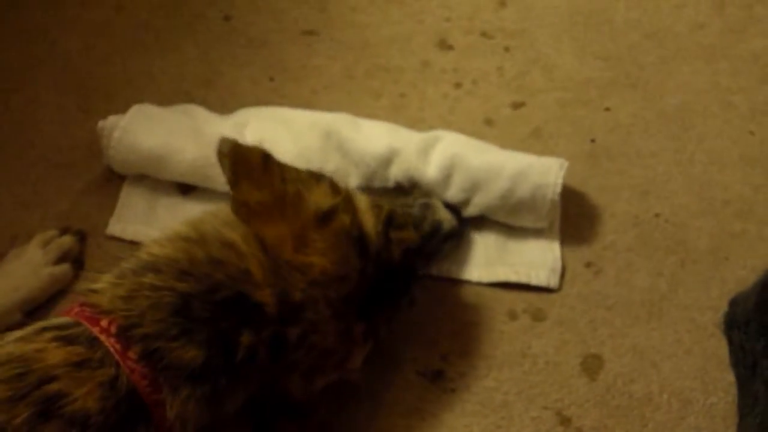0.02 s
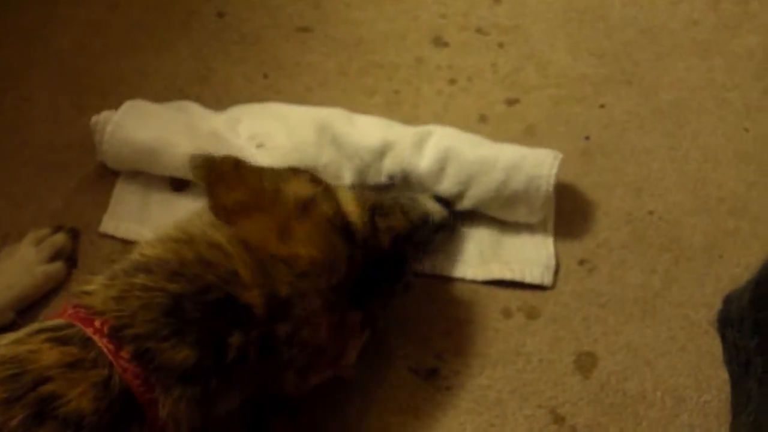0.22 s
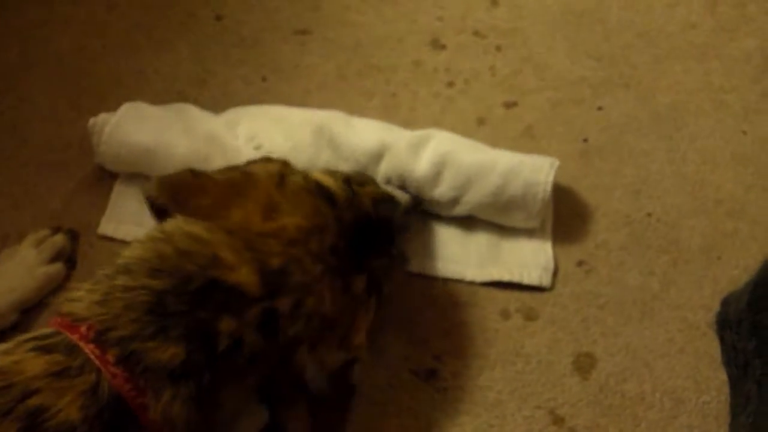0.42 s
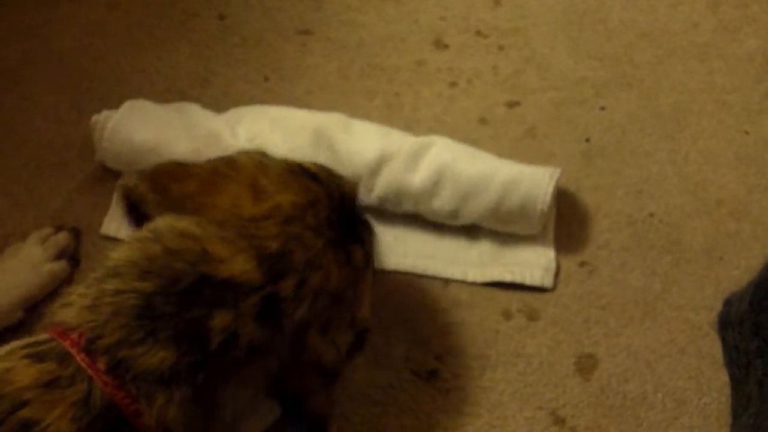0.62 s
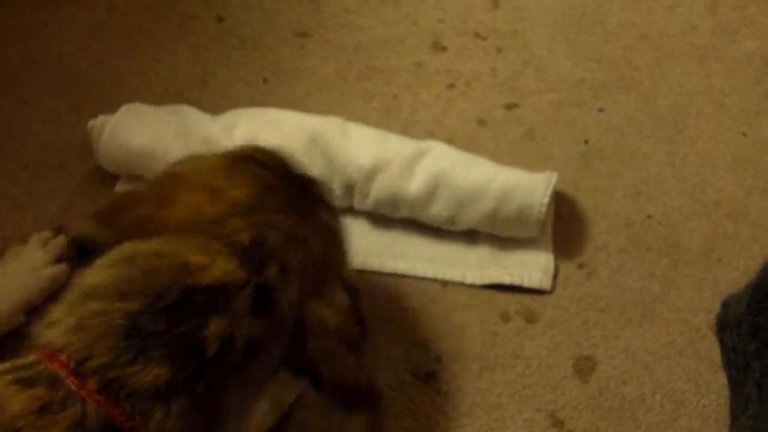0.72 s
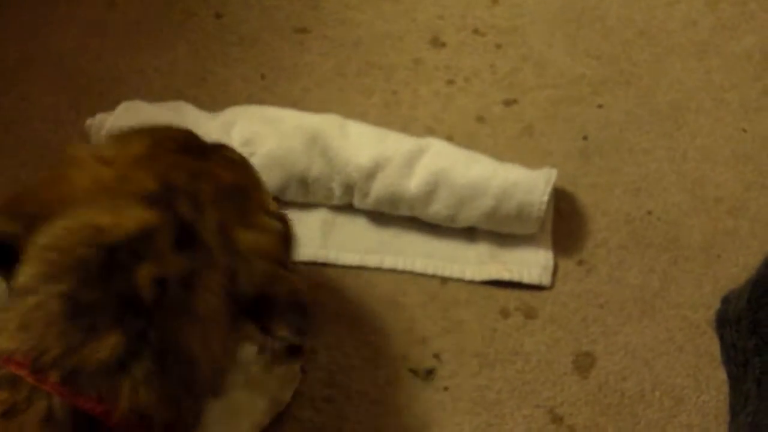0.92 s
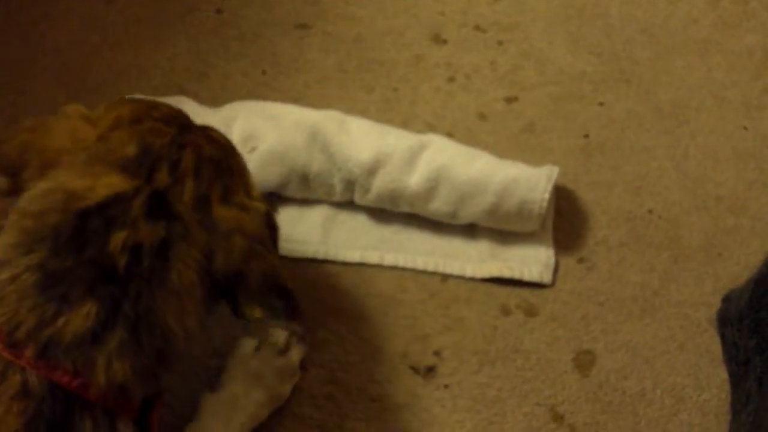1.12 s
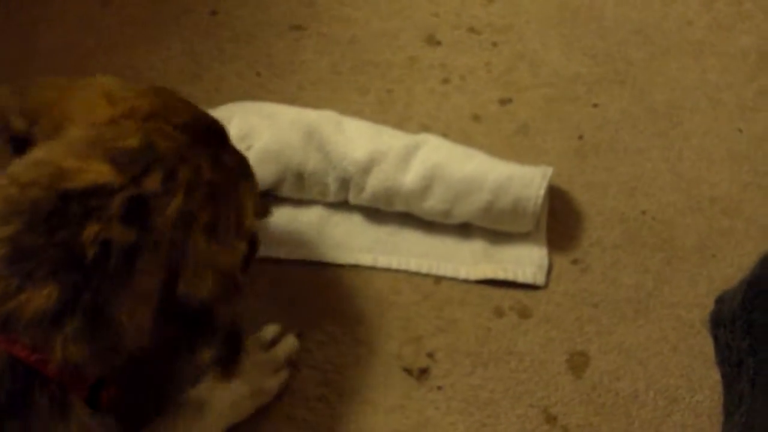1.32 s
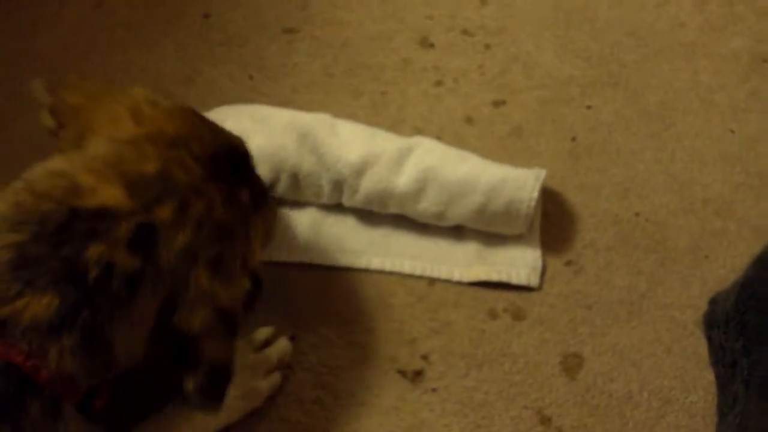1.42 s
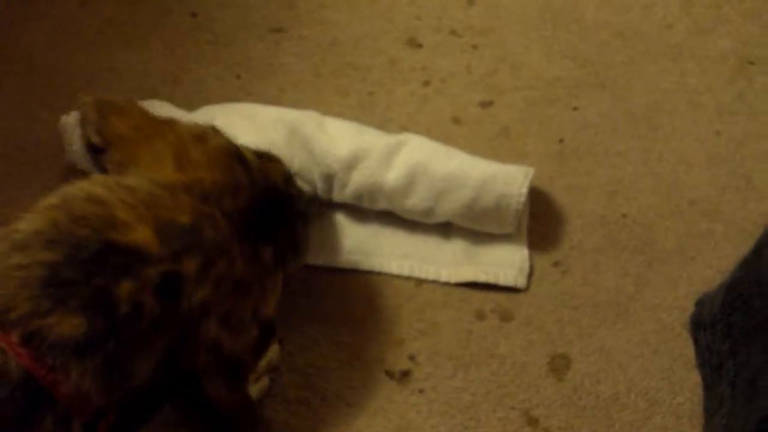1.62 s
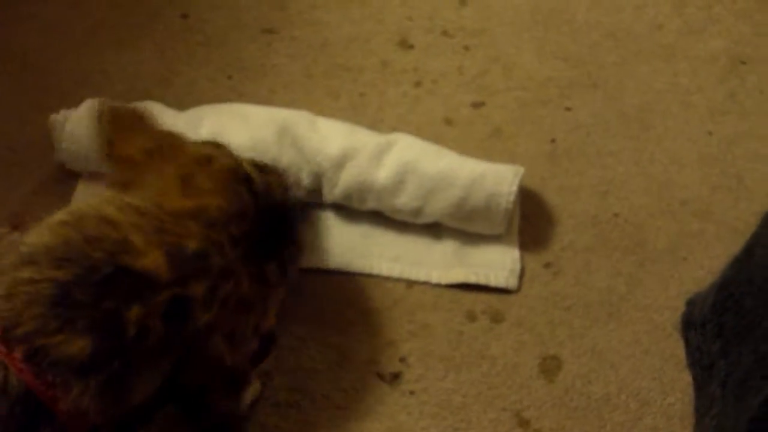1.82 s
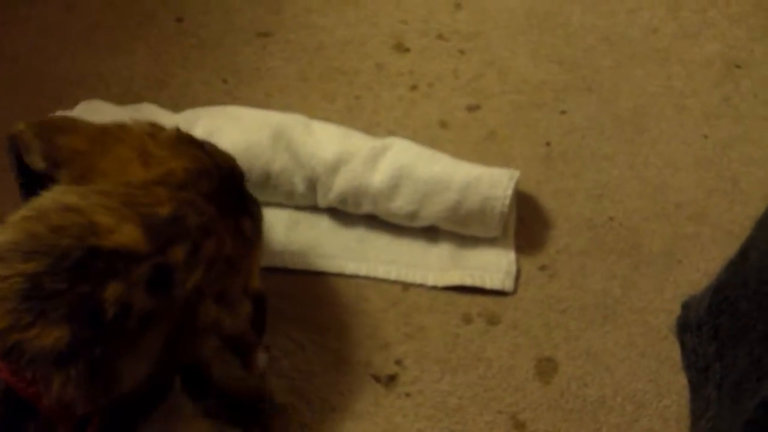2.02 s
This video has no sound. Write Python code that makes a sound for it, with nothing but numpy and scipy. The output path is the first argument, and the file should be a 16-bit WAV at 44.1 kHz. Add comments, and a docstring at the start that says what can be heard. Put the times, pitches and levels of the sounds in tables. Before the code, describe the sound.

A steel training clicker snaps twice, very close to the microphone, just after light collar tag ticks. Then a dog shuffles on carpet with cloth rustles, hollow dull knocks and faint tinkles in a small furnished room.

```python
"""Dog and clicker on a carpet

A dog noses about a rolled towel: its collar tags tick, and a steel spring, probably a training clicker,
snaps down and up close to the microphone. Then the dog shuffles, with rustles, dull knocks and faint tinkles.
Struck things are sets of ringing tones; cloth, paws, hiss and rumble are shaped noise. A small furnished
room answers, and the microphone's gain control turns loud peaks down and then recovers.
"""
import sys
import numpy as np
from scipy import signal
from scipy.fft import rfft, irfft, next_fast_len
from scipy.io import wavfile
from scipy.ndimage import minimum_filter1d, map_coordinates

SR = 44100
rng = np.random.default_rng(int(sys.argv[2]) if len(sys.argv) > 2 else 0)


def unload_wav(signal):
    """Save mono or channel-first audio to the path in sys.argv[1] as 16-bit WAV at rate SR, clipped to [-1, 1]."""
    wavfile.write(
        sys.argv[1],
        SR,
        np.round(np.clip(np.atleast_2d(signal).T, -1, 1) * 32767).astype(np.int16),
    )


N = 92610  # samples, 2.1 s


def amp(db):
    """Turn decibels into a gain."""
    return 10 ** (np.asarray(db) / 20)


def unit(x):
    """Scale a sound to an rms of 1."""
    return x / np.sqrt(np.mean(x ** 2) + 1e-20)


def along(points, hz):
    """Read a curve of (f/Hz, value) points, joined up on a log frequency axis."""
    f, value = np.transpose(points)
    return np.interp(np.log(hz + 1), np.log(f + 1), value)


def since(s):
    """Seconds passed since time s, and zero before it."""
    return np.maximum(np.arange(N) / SR - s, 0)


def wobble(rate):
    """A smooth random curve through `rate` random points a second."""
    points = rng.standard_normal(N // 8)
    return map_coordinates(points, [np.arange(N) * rate / SR], mode="wrap")


def filtered(x, response):
    """Change each frequency of x by the gain response(hz)."""
    size = next_fast_len(N + SR // 2)
    hz = np.fft.rfftfreq(size, 1 / SR)
    return irfft(rfft(x, size) * response(hz), size)[:N]


def noise(colour, tilt_db=0):
    """Noise of rms 1 with a given colour, tilted by tilt_db per octave above 700 Hz."""
    def response(hz):
        octaves = np.log2(np.maximum(hz, 700) / 700)
        return amp(along(colour, hz) + tilt_db * octaves)
    return unit(filtered(rng.standard_normal(N), response))


def swell(s, spread):
    """A bell-shaped rise and fall around time s; spread is its standard deviation in seconds."""
    return np.exp(-.5 * ((since(0) - s) / spread) ** 2)


def struck(s, modes, damp_s=1):
    """A blow at time s sets tones ringing: wider ones die faster, and all are choked over damp_s."""
    t = np.arange(SR // 5) / SR
    ring = np.zeros(len(t))
    for k, (hz, width, db) in enumerate(modes):
        sign = (-1) ** k
        strength = amp(db) * 2 * np.pi * width / SR
        ring += sign * strength * np.exp(-np.pi * width * t) * np.sin(2 * np.pi * hz * t)
    out = np.zeros(N + SR)
    out[round(s * SR):][:len(t)] = ring * np.exp(-(t / damp_s) ** 2)
    return out[:N]


# how long the room rings on at each pitch: f/Hz, time to fall by 60 dB/s
ROOM_DECAY = [(100, 0.11), (1000, 0.2), (4000, 0.15), (8000, 0.19), (16000, 0.45)]
# colour of the room's tail: f/Hz, relative level/dB
ROOM_COLOUR = [(100, 9), (1200, -1.5), (3000, -1), (8500, 3.5), (12000, -3.5), (16000, 0.5)]
# early echoes off the walls: delay t/s, gain (plain ratio)
WALL_ECHOES = [(.0055, .15), (0.0101, 0.082), (0.0145, 0.16)]


def room(x):
    """The room answers with a few early echoes and a short tail that fades at its own pace at each pitch."""
    hz, t, grains = signal.stft(rng.standard_normal(SR // 2), SR, nperseg=256)
    fade_db = -60 * t / along(ROOM_DECAY, hz)[:, None]
    colour_db = along(ROOM_COLOUR, hz)[:, None]
    answer = signal.istft(grains * amp(colour_db + fade_db), SR, nperseg=256)[1]
    answer = answer / np.linalg.norm(answer)
    for delay, gain in WALL_ECHOES:
        answer[round(delay * SR)] += gain
    return signal.fftconvolve(x, answer)[:N]


# colour of the steady hiss: f/Hz, relative level/dB
HISS_COLOUR = [(20, -10.5), (100, -5.5), (300, -10), (650, -11), (1300, -13.5), (2400, -15.5), (4500, -17),
               (6600, -18.5), (7600, -17.5), (8400, -18), (9100, -19), (10000, -19.5), (16000, -23)]
# colour of the rumble: f/Hz, relative level/dB
RUMBLE_COLOUR = [(8, -4), (15, 15), (40, 3.5), (60, 1), (87, -10), (130, -2), (170, -14), (280, -12),
                 (420, -21.5), (900, -29.5), (3000, -76)]
# how the movement rumble rises and falls, before its random swing: t/s, level/dB
RUMBLE_LEVEL = [(0, -46), (.22, -49), (0.301, -48), (.47, -46.5), (.56, -57.5), (0.671, -55.5), (.8, -45.5),
                (1.001, -51.5), (1.298, -48), (1.42, -50), (1.62, -48), (1.8, -50), (2.1, -47)]
# low hum: f/Hz, level/dB when the rumble is at its median level
HUM = [(55.6, -57.5), (119.5, -64), (219, -70.5), (302, -71.5)]
# thin high whine: f/Hz, level/dB
WHINE = [(8538, -74), (8607, -82.5), (9356, -84)]
HISS_DB, RUMBLE_SWING_DB = -57.5, 2
HUM_FOLLOWS = 1.1  # dB of hum per dB of rumble
TONE_DRIFT = 0.21  # how far the hum and whine wander in phase, radians


def steady_tones(table):
    """Sum steady tones whose phase wanders a little."""
    out = np.zeros(N)
    for hz, db in table:
        phase = 2 * np.pi * hz * since(0) + TONE_DRIFT * wobble(14)
        out += amp(db) * np.sqrt(2) * np.sin(phase)
    return out


def background():
    """Steady hiss and a thin whine; an uneven rumble, and a low hum that sinks and rises with it."""
    hiss = amp(HISS_DB) * noise(HISS_COLOUR)
    level_db = np.interp(since(0), *np.transpose(RUMBLE_LEVEL))
    rumble = amp(level_db + RUMBLE_SWING_DB * wobble(2.3)) * noise(RUMBLE_COLOUR)
    hum_gain = amp(HUM_FOLLOWS * (level_db - np.median(level_db)))
    return hiss + steady_tones(WHINE) + rumble + hum_gain * steady_tones(HUM)


# soft footfalls on the carpet: t/s, level/dB before fading
STEPS = [(0.686, -34.5), (0.793, -39), (.822, -39), (1.96, -44)]
# colour of a footfall: f/Hz, relative level/dB
STEP_COLOUR = [(20, 15.5), (60, -5.5), (130, -14), (250, -13.5), (500, -21), (1500, -23), (5000, -66)]
STEP_S = 0.016  # fading time, seconds


def steps():
    """Paws land as soft, low puffs: noise that swells quickly and fades."""
    out = np.zeros(N)
    for s, db in STEPS:
        u = since(s) / STEP_S
        out += amp(db) * noise(STEP_COLOUR) * np.exp(-u) * (1 - np.exp(-10 * u))
    return out


# scrapes: middle t/s, spread/s, f/Hz, level/dB at the middle
SCRAPES = [(0.215, 0.0086, 834, -55.5), (0.762, 0.013, 1560, -54.5), (0.784, 0.015, 670, -54),
           (0.934, 0.021, 1450, -61.5), (1.008, 0.013, 1240, -53), (1.015, 0.0029, 4560, -42.5),
           (1.061, 0.014, 1060, -58), (1.069, 0.018, 780, -52), (1.114, 0.0021, 7970, -36),
           (1.144, 0.01, 1060, -46), (1.311, 0.021, 1080, -51), (1.321, 0.0066, 5500, -50),
           (1.328, 0.0022, 4300, -43.5), (1.327, 0.005, 930, -42), (1.357, 0.01, 1060, -48)]
SCRAPE_Q = 8.3  # sharpness of the resonance


def scrapes():
    """Each short scrape is noise that excites one resonance."""
    out = np.zeros(N)
    for s, spread, hz, db in SCRAPES:
        width = hz / SCRAPE_Q
        tone = filtered(rng.standard_normal(N), lambda f: 1j * f * width / (hz ** 2 - f ** 2 + 1j * f * width))
        out += amp(db) * unit(tone) * swell(s, spread)
    return out


# scuffs of paws and fur: middle t/s, spread/s, level/dB at the middle, treble tilt/dB per octave
SCUFFS = [(0.21, 0.0084, -57, -1), (.775, 0.016, -54.5, -8), (0.949, 0.024, -57, -2.5),
          (1.012, 0.0066, -47.5, 0.5), (1.028, .005, -42, -2.5), (1.074, 0.071, -53, -3.5),
          (1.109, 0.0026, -38.5, -0.5), (1.173, 0.0054, -50, -8), (1.183, 0.026, -44.5, -5),
          (1.291, 0.0023, -49, -1), (1.3262, 0.0056, -40.5, 6.5), (1.337, 0.016, -44.5, -2),
          (1.381, 0.0037, -41, -3.5), (1.392, 0.0021, -40.5, 9), (1.399, 0.039, -47.5, -5.5),
          (1.455, .003, -63, 3), (1.52, 0.01, -58, -1), (2.004, 0.045, -54, -1.5), (2.095, 0.019, -59, -1)]
# colour of rubbed cloth before the tilt: f/Hz, relative level/dB
CLOTH_COLOUR = [(100, 1.5), (280, 5), (620, -6.5), (1050, 1.5), (1600, -0.5), (2600, -2), (3600, -3.5),
                (4700, -2), (6300, -9), (8200, 2), (10500, -19.5), (16000, -30.5)]
FIBRE_DB, FIBRES_PER_S = 2.5, 700  # depth and rate of the grain


def rustle():
    """Short strokes over cloth and carpet: noise, grainy as the fibres catch."""
    out = np.zeros(N)
    for s, spread, db, tilt in SCUFFS:
        grainy = unit(noise(CLOTH_COLOUR, tilt) * amp(FIBRE_DB * wobble(FIBRES_PER_S)))
        out += amp(db) * grainy * swell(s, spread)
    return out


# dull knocks: t/s, thud level/dB, knock f/Hz, knock level/dB, crack level/dB before its fade
KNOCKS = [(.1930, -20.5, 1272, -10, -41), (1.0090, -2.5, 1210, 1, -43.5), (1.03, -14, 1150, -1, -73),
          (1.0544, 6, 960, 0.5, -39), (1.083, 10.5, 980, 0, -44), (1.1319, 20, 1049, 16, -28),
          (1.1713, 3, 1210, 20, -30), (1.1819, -4, 1204, 11.5, -57), (1.3694, 9.5, 1050, -5, -37.5),
          (1.3861, 20, 1007, 10.5, -36.5), (1.3897, 19.5, 1188, 6, -31.5), (2.0542, -18, 1435, -7, -41.5),
          (2.0965, -25, 1930, -8, -67)]
# ringing of the floor: f/Hz, width/Hz, relative level/dB
THUD_MODES = [(268.5, 27, 0.5), (303, 40, -1), (449, 46, -10.5)]
# hollow ring: ratio to the knock's f, width/Hz, relative level/dB
KNOCK_MODES = [(0.841, 150, -8.5), (1, 90.8, 6), (1.139, 183, -4), (2.55, 350, -14.5)]
# colour of the crack: f/Hz, relative level/dB
CRACK_COLOUR = [(200, 6.5), (900, -6), (1700, 0.5), (2700, 0), (3700, -13), (4600, -7.5), (6300, -21),
                (8200, -8.5), (11000, -27.5), (16000, -26)]
CRACK_S = .003  # fading time, seconds
CONTACT_HZ = 2200  # a soft contact rounds off the treble of thud and ring


def knocks():
    """Each knock has a thud in the floor, a hollow ring and a brief crack of noise."""
    body, cracks = np.zeros(N), np.zeros(N)
    for s, thud_db, knock_hz, knock_db, crack_db in KNOCKS:
        body += amp(thud_db) * struck(s, THUD_MODES)
        ring_modes = [(knock_hz * ratio, width, db) for ratio, width, db in KNOCK_MODES]
        body += amp(knock_db) * struck(s, ring_modes)
        u = since(s) / CRACK_S
        cracks += amp(crack_db) * noise(CRACK_COLOUR) * 2 * np.exp(-u) * (1 - np.exp(-4 * u))
    softened = filtered(body, lambda hz: 1 / (1 + (hz / CONTACT_HZ) ** 2))
    return softened + cracks


# ringing of the collar tags, before pitch and tilt: f/Hz, width/Hz, relative level/dB
TAG_MODES = [(2450, 350, -18.5), (3500, 360, -14), (4550, 130, 0), (6350, 500, -16), (7200, 200, -5),
             (8200, 300, 0), (8500, 130, 1), (9300, 210, -6.5), (10900, 600, -12.5), (11700, 400, -16),
             (14600, 900, -16.5)]
# tag ticks: t/s, level/dB added to the modes, tilt/dB per octave, pitch ratio
TICKS = [(.0878, 2, -0.5, 1), (.0943, -11.5, -7, 1.2), (.1030, -35, -7, 0.96), (.1140, -40.5, -1, 1.15),
         (.1459, 8, 3.5, 0.97), (.2223, 3.5, -6, 1.02), (.2395, -8, -8.5, 0.76), (1.0100, -12, -7, 0.98),
         (1.1078, -15, -2, 1.3), (1.11, -13, -2, 1.06), (1.3095, -14.5, 8.5, 1.2), (1.3263, -8, -3.5, 1.04),
         (1.3570, -14, -2, 1.1)]
# faint tinkles of a tag's rim: t/s, starting level/dB
TINKLES = [(.966, -50), (.983, -56), (1.277, -49), (1.668, -55), (1.752, -48), (2.032, -52)]
FUR_DAMP_S = .0028  # the fur chokes a tick over this time
RIM_HZ, RIM_T60_S = 9280, .04  # rim pitch, and seconds to fall by 60 dB


def tags():
    """The tags touch in short ticks choked by fur; now and then a rim rings faintly as one fading tone."""
    out = np.zeros(N)
    pivot_hz = TAG_MODES[5][0]  # the tilt turns about this mode
    for s, db, tilt, pitch in TICKS:
        modes = [(hz * pitch, width, level + tilt * np.log2(hz / pivot_hz)) for hz, width, level in TAG_MODES]
        out += amp(db) * struck(s, modes, FUR_DAMP_S)
    for s, db in TINKLES:
        t = since(s)
        out += amp(db - 60 * t / RIM_T60_S) * np.sin(2 * np.pi * RIM_HZ * t)
    return out


# the spring going down: f/Hz, width/Hz, relative level/dB
PRESS_MODES = [(3660, 600, -6), (4174, 220, -13.5), (4646, 140, -25), (6000, 660, -6.5), (7320, 255, 2),
               (8140, 420, -3), (9150, 500, -0.5), (9670, 320, 2.5), (10400, 250, -5), (11850, 420, -21.5),
               (12360, 284, -5), (14680, 900, -10), (15550, 120, -12.5)]
# the spring coming back: f/Hz, width/Hz, relative level/dB
RELEASE_MODES = [(996, 680, -13), (2025, 920, -11.5), (3290, 284, -1.5), (4210, 195, -4), (4730, 280, -5),
                 (5910, 240, -2), (6770, 160, -1.5), (7520, 214, 3), (8030, 450, -1), (9180, 260, 3),
                 (10200, 120, -17), (12100, 160, -26), (13600, 1300, -16), (15200, 230, -22)]
# snaps: t/s, level/dB added to the modes, low push level/dB, room level/dB, room tilt/dB per octave,
# wall echo level/dB relative to the snap
SNAPS = [(0.2417, 26, 21.5, -23, 1.5, -13.5), (0.4501, 25.5, 3, -32, -5, -28.5)]
# colour of the room's hiss after a snap, before the tilt: f/Hz, relative level/dB
SNAP_TAIL_COLOUR = [(200, -37.5), (900, -21), (2200, -11), (4300, -3.5), (6300, -4), (8400, 2.5),
                    (10000, 0), (11500, -11.5), (14000, -5.5), (16000, -14.5)]
# colour of the wall's echo: f/Hz, level/dB added to the echo
ECHO_COLOUR = [(1000, -11.5), (3000, -7), (6500, -12), (8600, 4.5), (10500, -16.5), (16000, -13)]
PUSH_S, THUMB_DAMP_S, ECHO_S = .00011, 0.01, .0151  # push time, choking time, echo delay, seconds
TAIL_EARLY_T60_S, TAIL_LATE_T60_S, TAIL_LATE_DB = .13, 0.2, -10  # a fast fade and a weaker, slower one


def clicker():
    """Each snap is a push of air and a burst of choked tones; a wall echoes it and the room hisses briefly."""
    out = np.zeros(N)
    for snap_row, modes in zip(SNAPS, (PRESS_MODES, RELEASE_MODES)):
        s, db, push_db, room_db, tilt, echo_db = snap_row
        t = since(s)
        snap = amp(db) * struck(s, modes, THUMB_DAMP_S)
        push = -amp(push_db) * t / PUSH_S * np.exp(-t / PUSH_S) / (PUSH_S * SR)
        late_snap = struck(s + ECHO_S, modes, THUMB_DAMP_S)
        echo = amp(db + echo_db) * filtered(late_snap, lambda hz: amp(along(ECHO_COLOUR, hz)))
        fade = amp(-60 * t / TAIL_EARLY_T60_S) + amp(TAIL_LATE_DB - 60 * t / TAIL_LATE_T60_S)
        tail = amp(room_db) * (t > 0) * fade * noise(SNAP_TAIL_COLOUR, tilt)
        out += snap + push + echo + tail
    return out


TAG_ROOM_DB, DOG_ROOM_DB = -15.5, -11  # how much tags and paws feed the room


def scene():
    """The clicker is near; the dog is farther off, with more of the room."""
    behind = background() + steps()
    paws = scrapes() + rustle() + knocks()
    collar = tags()
    answer = room(amp(TAG_ROOM_DB) * collar + amp(DOG_ROOM_DB) * paws)
    return (behind + paws + collar + answer + clicker())[None]


DUCK_FROM_DB, DUCK_MAX_DB = -13.5, 8.5  # peaks above the first are turned down, by at most the second
DUCK_ATTACK_S, DUCK_HOLD_S, RECOVER_DB_PER_S = .006, 0.17, 27
CLIP_AT, TOP_HZ = .9, 16200  # level where loud peaks are clipped, before the top is cut; top of the band


def record(dry):
    """Gain control ducks after loud peaks, holds and recovers; what is still too loud clips; the top is cut."""
    x = dry[0]
    over_db = np.clip(20 * np.log10(np.abs(x) + 1e-9) - DUCK_FROM_DB, 0, DUCK_MAX_DB)
    half = int(DUCK_HOLD_S * SR / 2)
    # the largest excess over the past hold time
    held_db = -minimum_filter1d(-over_db, 2 * half + 1, origin=half, mode="constant")
    # let it fall no faster than the recovery rate
    ramp = RECOVER_DB_PER_S * since(0)
    target_db = np.maximum.accumulate(held_db + ramp) - ramp
    # smooth it, so that the ducking sets in gradually
    pole = np.exp(-1 / (DUCK_ATTACK_S * SR))
    duck_db = signal.lfilter([1 - pole], [1, -pole], target_db)
    clipped = np.clip(x * amp(-duck_db), -CLIP_AT, CLIP_AT)
    return filtered(clipped, lambda hz: 1 / (1 + (hz / TOP_HZ) ** 80))[None]


dry = scene()
out = record(dry)
unload_wav(out)
```